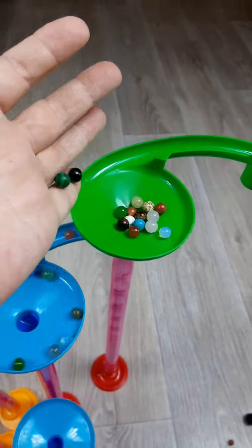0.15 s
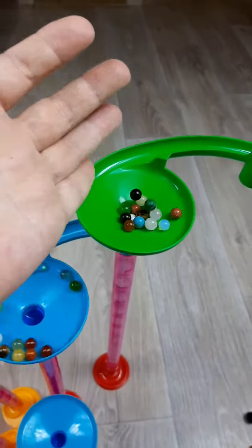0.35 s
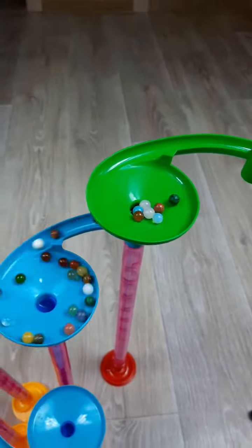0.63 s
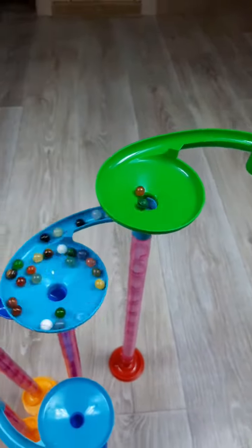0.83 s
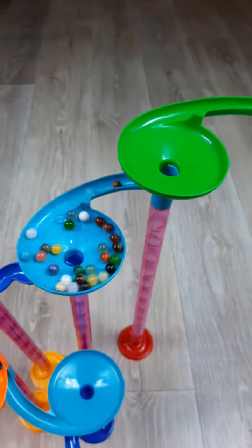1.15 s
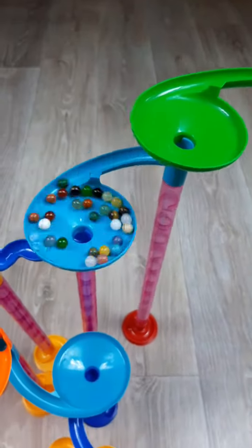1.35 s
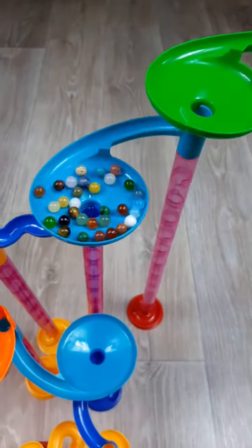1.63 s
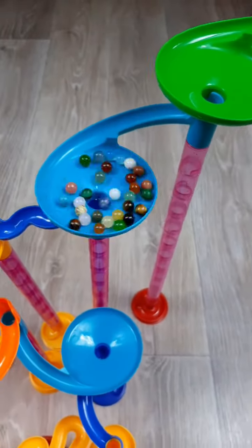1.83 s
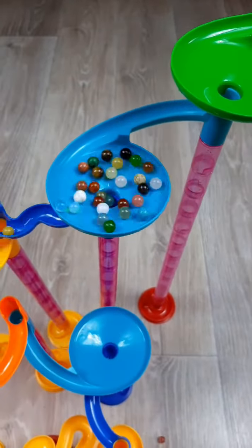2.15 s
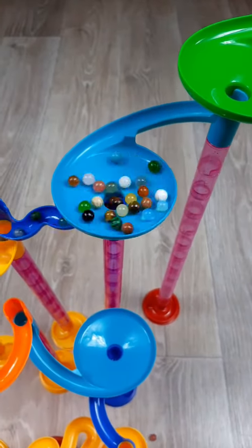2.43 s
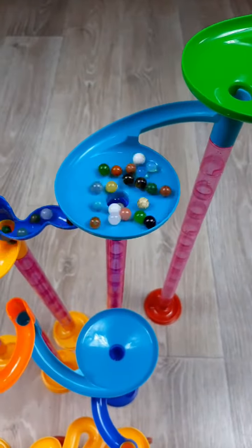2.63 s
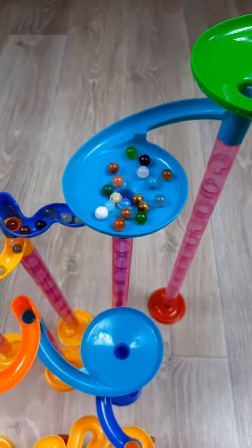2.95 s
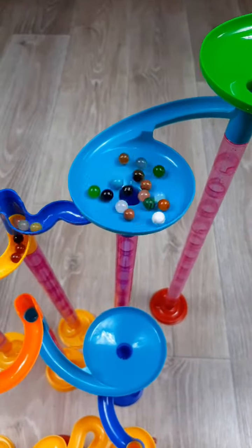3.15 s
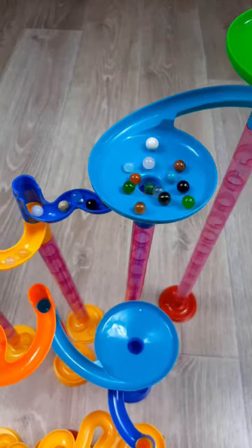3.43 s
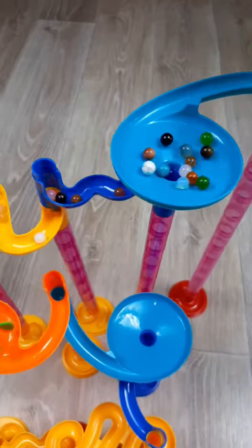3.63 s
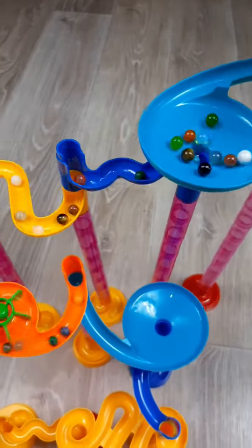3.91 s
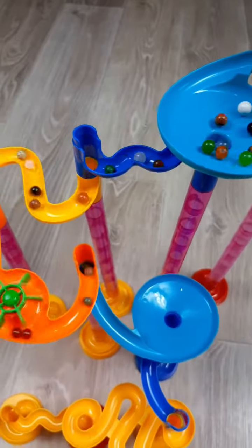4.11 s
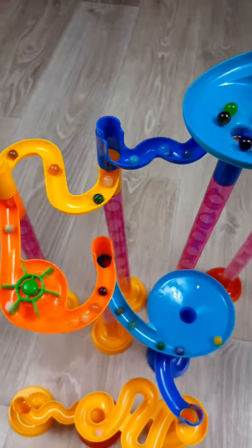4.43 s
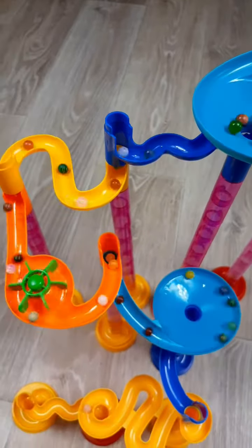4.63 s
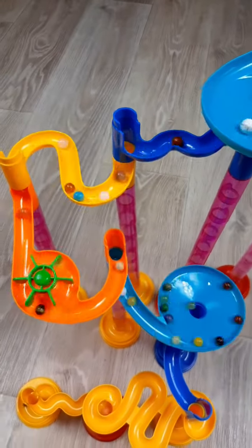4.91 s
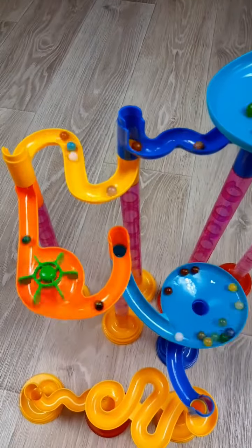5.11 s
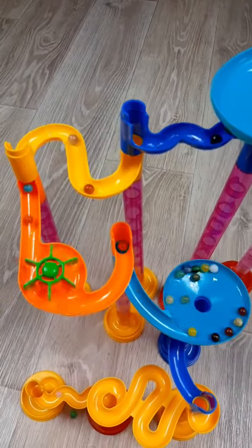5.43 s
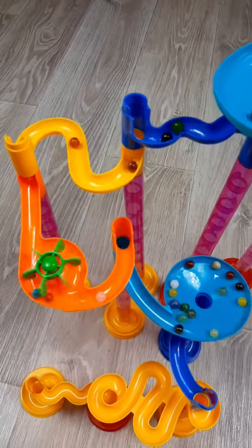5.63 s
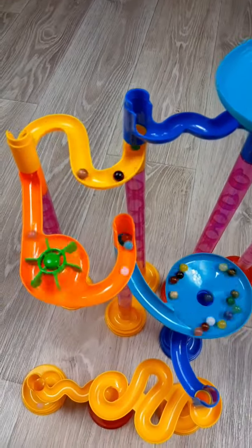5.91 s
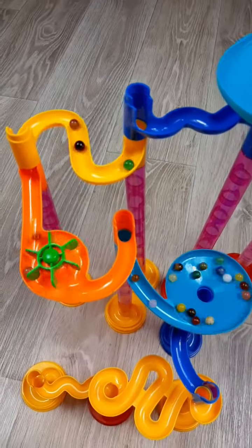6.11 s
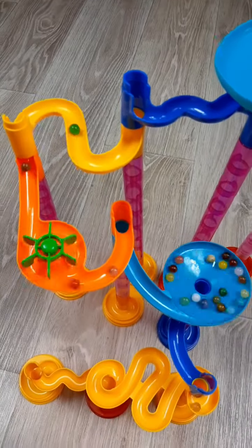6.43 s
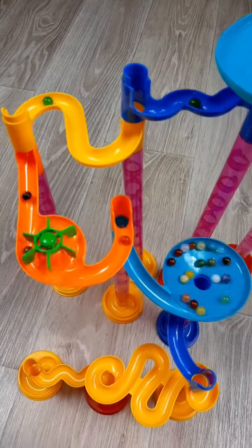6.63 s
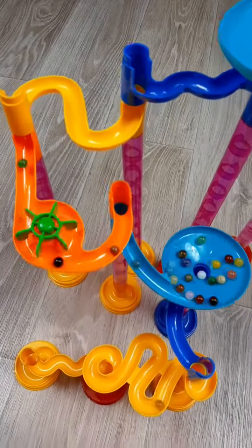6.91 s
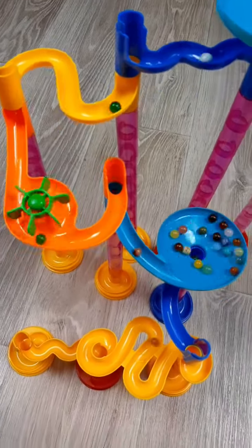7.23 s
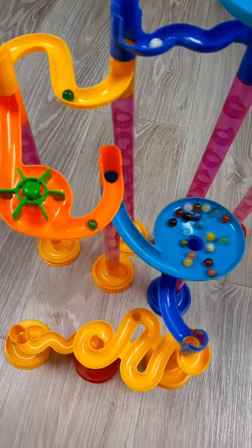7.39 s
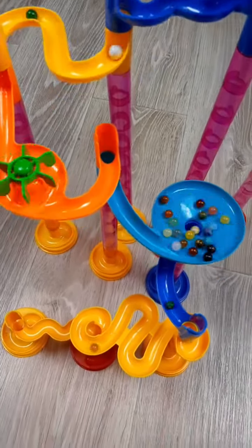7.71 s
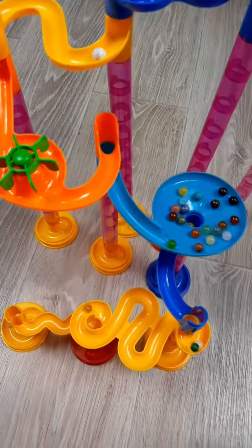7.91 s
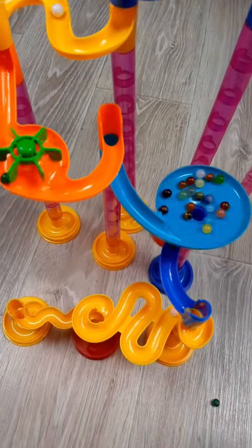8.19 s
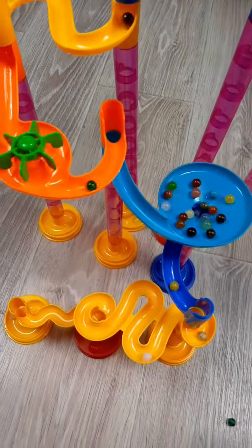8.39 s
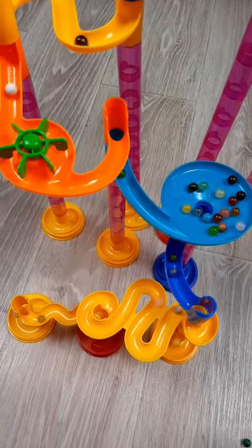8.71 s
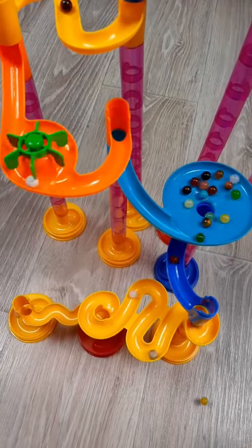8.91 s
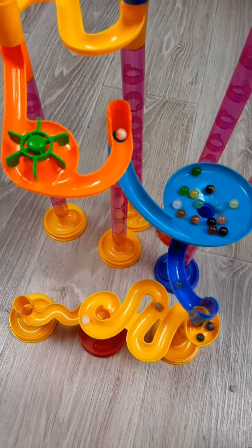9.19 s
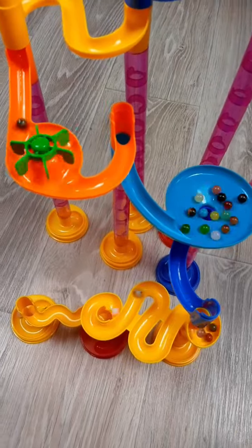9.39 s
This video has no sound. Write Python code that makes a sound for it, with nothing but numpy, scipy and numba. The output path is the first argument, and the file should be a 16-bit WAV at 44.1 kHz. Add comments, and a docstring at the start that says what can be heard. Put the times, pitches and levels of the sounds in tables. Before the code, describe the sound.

Close to a phone microphone in a small room, glass marbles swirl in plastic funnels and rattle along tracks without a break. The rolling starts as a grainy whirr with scattered clicks, then the clicking gets harder and busier, and the whirr changes tone as the marbles reach a lower funnel. Now and then a stray marble bounces on the floorboards with a lower, hollow knock. A faint rumble lies underneath.

```python
"""Glass marbles run through plastic funnels and tracks on a laminate floor, close to a phone in a small
bare room. From the start, rolling on fine texture whirrs in the top funnel, the towers rumble, and
impacts excite the damped modes of the thin plastic. At 0.3 s the first of a few strays strikes the
floorboards. The swarm passes to the middle funnel before 2 s, the knocks grow harder, and from about
4 s it circles in the bottom funnel. Throughout, two microphone ports receive the sound slightly apart."""
import sys
import numpy as np
from scipy import signal
from scipy.fft import rfft, irfft, next_fast_len
from scipy.io import wavfile
from scipy.ndimage import uniform_filter1d, minimum_filter1d
from numba import njit

SR = 44100
rng = np.random.default_rng(int(sys.argv[2]) if len(sys.argv) > 2 else 0)


def store_pcm(level_fs):
    """Save levels as 16-bit WAV."""
    pcm = np.round(np.clip(level_fs, -1, 1) * 32767).astype(np.int16)
    wavfile.write(sys.argv[1], SR, np.atleast_2d(pcm).T)


N = 421155
TIME = np.arange(N) / SR

# The crowd of marbles. Each row: time in seconds, then relative levels in dB of the rolling,
# of the small clatter and of the rolling's treble.
SWARM = [(0.0, -26, -29, 8), (0.26, -32, -38, -4), (0.29, -30, -30, -1), (0.66, -26.5, -28.5, 1.5),
         (1.25, -29, -30, 2.5), (1.44, -28.5, -35.5, -2.5), (1.75, -30, -38.5, -5.5), (1.83, -27, -32, -1),
         (1.94, -30.5, -36, -4), (2.1, -31.5, -38, -7), (2.13, -29.5, -25, 7), (2.2, -30.5, -37, -7),
         (2.31, -33, -26, 2), (2.5, -33.5, -30, 2), (2.53, -35, -31, -7), (2.55, -30, -28, -1),
         (2.69, -29, -22, 6.5), (2.79, -32, -35, 0), (2.87, -28, -26, -0.5), (3.11, -32.5, -26.5, -0.5),
         (3.14, -31, -23.5, 1), (3.46, -29.5, -27, -3), (3.48, -30.5, -27.5, 3), (3.93, -28.5, -24.5, 5),
         (4.79, -27, -23, -0.5), (5.0, -29, -24, 2.5), (5.08, -30, -35, -7.5), (5.21, -30, -26, -3),
         (5.42, -31.5, -26.5, 2), (5.77, -28.5, -37.5, -3), (5.8, -27.5, -27.5, -8.5),
         (6.01, -30.5, -28.5, 0), (6.04, -30, -17.5, 0), (6.12, -29.5, -36, -10.5),
         (6.44, -28.5, -24.5, -3), (6.49, -29.5, -35, -8), (6.86, -28.5, -29, -2.5),
         (7.29, -28.5, -33, -1.5), (7.5, -30, -36, -7.5), (7.85, -27.5, -32, -2.5),
         (8.22, -28.5, -32.5, -5), (8.24, -36, -41, -6), (8.27, -30.5, -37, -6), (8.67, -29.5, -25.5, 2),
         (8.83, -26, -28.5, -9), (8.93, -29, -23.5, -3), (9.1, -29.5, -36, -9), (9.15, -34, -28, -4),
         (9.18, -31.5, -31, -10), (9.55, -29, -34, 3.5)]
# Where the swarm is. Each row: time in seconds, weights (0-1) of the top, middle and bottom funnel.
FUNNEL_WEIGHTS = [(0, 1, .2, 0), (1.2, 1, .3, 0), (1.75, .3, .8, 0), (2.1, 0, 1, 0), (3.4, 0, 1, .1),
                  (4.2, 0, .3, 1), (9.55, 0, 0, 1)]
# Rolling spectra, one list a funnel from the top down. Each row: frequency in Hz, relative level in dB.
WHIRR_SPECTRA = [
    [(290, -60), (500, -17), (795, -5), (1300, -7), (3250, -4), (4530, -10), (12900, -24), (16000, -11.5)],
    [(290, -51), (500, -15.5), (1300, -8.5), (1440, -9.5), (3340, -6.5), (8330, -16.5), (14700, -25),
     (16000, -41)],
    [(290, -6), (500, 8), (1570, 3), (1790, 9.5), (7210, 8), (8330, -1.5), (14700, -2), (16000, -37)],
]
# Hollow resonances of the same funnels. Each row: frequency in Hz, bandwidth in Hz, nominal boost in dB.
FUNNEL_RESONANCES = [
    [(6250, 150, 3), (1460, 70, 3), (2800, 90, 2), (3290, 80, 4.5), (4050, 100, 3)],
    [(1460, 70, 5), (2860, 100, 3), (3330, 120, 2), (3890, 110, 4)],
    [(1200, 70, 3), (1750, 110, 4), (2200, 100, 3), (2620, 90, 4), (3180, 120, 2.5)],
]
# Shaking of the towers. Each row: time in seconds, relative level in dB.
RUMBLE_LEVELS = [(0.0, -59.5), (0.1, -68), (0.5, -64.5), (2.07, -68.5), (2.13, -67), (2.53, -66.5),
                 (3.35, -62.5), (3.4, -64.5), (4.18, -60), (4.84, -61), (5.0, -57), (5.05, -61.5),
                 (7.85, -65), (7.9, -61.5), (8.81, -63.5), (8.83, -55), (9.23, -65.5), (9.55, -62)]
# Spectrum of that shaking. Each row: frequency in Hz, relative level in dB.
RUMBLE_SPECTRUM = [(15, -52), (25, -22), (43, -16), (114, -5.5), (217, -6.5), (339, 0), (454, -2),
                   (494, -4), (700, -20), (910, -4.5), (1540, -120)]
# Hum of the support tubes. Each row: frequency in Hz, bandwidth in Hz, boost in dB.
TUBE_RESONANCES = [(344.4, 6.6, 9.5)]
# Distinct impacts on plastic. Each row: start in seconds, relative level in dB, pitch of the struck
# part in Hz, offset of the crack's drive in dB.
KNOCKS = [(0.0233, -30.5, 3350, -20), (0.0715, -21, 3230, -16), (0.1393, -14, 6040, -23),
          (0.1977, -12, 3980, -24), (0.2914, -14.5, 2370, -6.5), (0.3406, -10.5, 4350, -14.5),
          (0.3667, -20, 3320, -19), (0.391, -21.5, 3180, -11), (0.4622, -11.5, 3230, -14),
          (0.4926, -14, 3280, -22), (0.599, -16, 6530, -18), (0.626, -11, 4010, -28),
          (0.6888, -27, 3320, -22), (0.731, -31, 3260, -24), (0.744, -20, 2750, -14),
          (0.782, -9.5, 3280, -21), (0.8188, -12.5, 6280, -17), (0.899, -24, 3340, -15),
          (0.9246, -25, 3110, -9), (1.0563, -20, 3120, -24.5), (1.1125, -16, 3030, -23.5),
          (1.1573, -13, 3290, -27), (1.244, -20.5, 3170, -13.5), (1.3274, -18.5, 6340, -14),
          (1.7698, -32, 2920, -17), (1.7888, -18, 2470, -15), (1.8355, -6, 3880, -19.5),
          (1.8785, -15, 2250, -20), (2.117, -3, 3900, -23), (2.146, -12, 3900, -18),
          (2.171, -10.5, 3040, -21), (2.2142, -20, 3350, -17), (2.2317, 1.5, 3900, -19),
          (2.2879, 1, 7260, -19.5), (2.3185, -7, 3890, -17), (2.325, -9, 6500, -17), (2.38, -10, 3900, -21),
          (2.4107, -9, 3000, -17), (2.425, -5, 3940, -22), (2.474, -5, 3900, -15), (2.5482, -8, 3880, -22),
          (2.565, -11, 4000, -22), (2.609, -7.5, 3870, -21), (2.6896, -21, 3590, -29),
          (2.722, -12.5, 3600, -28), (2.8065, -27, 5450, -27), (2.827, -14, 3880, -21),
          (2.8716, -4.5, 3850, -16), (2.9605, -14, 2920, -21.5), (2.971, -6, 3820, -23.5),
          (3.02, -13, 3950, -21), (3.057, -14.5, 7000, -14), (3.0974, -12, 5010, -25),
          (3.1259, -1.5, 4000, -20), (3.1762, -4, 3840, -13), (3.209, -19, 3970, -13),
          (3.2462, -1.5, 2900, -16), (3.2747, -18.5, 3830, -20), (3.3113, -12.5, 3900, -24),
          (3.3744, -14, 3950, -17), (3.488, -9, 6700, -17), (3.5084, -7.5, 3870, -23),
          (3.573, -11, 3170, -21), (3.5962, -9, 3930, -16), (3.689, -26, 3940, -21),
          (3.714, -9.5, 6900, -21), (3.7464, -14, 6400, -19.5), (3.7763, -13, 6540, -15),
          (3.8197, -10, 3380, -17), (3.8382, -5.5, 3750, -16), (3.8725, -10, 3650, -22),
          (3.911, -10, 7000, -29), (3.9776, -16, 3660, -9), (4.0112, -6, 7120, -22),
          (4.049, -7.5, 4460, -23), (4.102, -6, 5250, -33), (4.1702, -7, 3600, -12),
          (4.2227, -8.5, 4770, -10.5), (4.2537, -14, 7600, -18), (4.268, -13, 6440, -16),
          (4.2892, -17, 7400, -14), (4.3211, -20, 5540, -18), (4.3563, -25, 2630, -32.5),
          (4.4112, -15.5, 4470, -19), (4.4313, -20, 5430, -25), (4.4612, -14, 4370, -18),
          (4.4962, -12.5, 6870, -25), (4.5506, -25, 3040, -14), (4.6005, -14, 4630, -15),
          (4.6275, -14.5, 7350, -11.5), (4.665, -12, 3420, -4), (4.7112, -17, 7540, -21),
          (4.7395, -8, 2500, -23), (4.8449, -7, 2660, -14), (4.904, -21, 2640, -9),
          (4.9313, -30, 4850, -17), (4.9439, -11, 6770, -8), (4.9945, -13, 2950, -11),
          (5.102, -24.5, 3200, -6), (5.1435, -12.5, 4400, -24), (5.1865, -21, 3320, -15),
          (5.2076, -17, 7700, -12.5), (5.226, -9.5, 6800, -19), (5.2473, -12.5, 7510, -18),
          (5.3195, -15, 3630, -13), (5.343, -14.5, 4630, -11), (5.3597, -13, 6630, -16),
          (5.4033, -18.5, 5140, -5), (5.4408, -11.5, 7040, -16), (5.486, -2, 3900, -16),
          (5.5827, -17.5, 4820, -13), (5.6236, -28, 5700, -13), (5.653, -20, 2630, -7),
          (5.6994, -15, 1830, -11), (5.757, -21, 1820, -17), (5.784, -12, 3680, -15),
          (5.823, -11.5, 7350, -18), (5.858, -14.5, 3880, -15), (5.878, -20, 3480, -19),
          (5.908, -12, 7310, -16), (5.9574, -15, 7720, -19), (6.0129, -20, 2610, -9),
          (6.0263, -8.5, 4370, -15), (6.068, -15, 6950, -6), (6.1357, -25, 3370, -8),
          (6.1456, -26, 3130, -7), (6.1696, -18.5, 2670, -8.5), (6.209, -12.5, 7100, -15),
          (6.3098, -13.5, 3370, -16), (6.338, -17, 3900, -20), (6.3617, -13, 4790, -16),
          (6.4119, -4.5, 6960, -25), (6.4425, -8, 7080, -21), (6.5504, -15, 6730, -10.5),
          (6.5849, -2.5, 7110, -22), (6.6423, -12, 4310, -17), (6.6905, -2.5, 3270, -12.5),
          (6.749, -17, 4400, -16), (6.8057, -21, 2630, -20), (6.83, -4.5, 6700, -14),
          (6.8826, -8.5, 4100, -13), (6.935, -20, 5950, -12), (6.9508, -0.5, 3670, -13),
          (7.0512, -8, 3960, -15), (7.0771, -18, 4430, -14), (7.114, -20, 4420, -19),
          (7.1298, -7, 4350, -22.5), (7.202, -10, 3820, -38), (7.2178, -11.5, 7800, -22),
          (7.251, -10, 4220, -21), (7.268, -9, 3800, -26), (7.3042, -10, 6250, -12),
          (7.3901, -11, 6400, -14), (7.4323, -18, 3090, -10), (7.4618, -16.5, 3300, -24),
          (7.558, -14, 3144, -17), (7.5796, -10, 7150, -11), (7.638, -9, 4440, -12),
          (7.6893, -13.5, 6700, -11.5), (7.7058, -11.5, 6700, -13), (7.7398, -19.5, 5340, -11),
          (7.7653, -19, 3890, -14), (7.7935, -9.5, 3940, -16), (7.813, -6.5, 3700, -23),
          (7.8405, -5, 4220, -14), (7.885, -6, 1740, -20), (7.8885, -8, 6430, -12), (7.896, -8, 3940, -24),
          (7.9378, -5.5, 3860, -15), (7.9706, -9, 4050, -16), (8.0097, -12, 3940, -26),
          (8.0356, -18, 3430, -35), (8.0503, -11.5, 4070, -19), (8.112, -15, 4800, -20),
          (8.1395, -4, 6900, -20), (8.1936, -12, 7000, -25), (8.2134, -20, 1860, -23),
          (8.259, -13.5, 2190, -21), (8.303, -14, 2140, -24), (8.316, -16, 3500, -19),
          (8.3445, -3.5, 6900, -11), (8.372, -12, 3670, -17), (8.4325, -6, 3900, -18),
          (8.4521, -2, 3820, -32), (8.4898, -15, 3840, -18), (8.538, -7.5, 3960, -15),
          (8.5908, -7, 3470, -18), (8.616, -8, 4110, -14), (8.6575, -11, 5140, -19),
          (8.6907, -16, 6860, -11), (8.736, -19, 3500, -14), (8.7837, -16, 3920, -15),
          (8.832, -18, 2830, -15), (8.8776, -6, 3740, -17), (8.9117, -2, 1840, -23), (8.928, -9, 4230, -19),
          (8.976, -8.5, 3700, -27), (9.028, -14.5, 3770, -19), (9.045, -10.5, 3400, -19),
          (9.122, -18, 6070, -15), (9.1489, -9, 4200, -13), (9.211, -15, 6700, -19),
          (9.222, -11, 6340, -16), (9.2547, -7, 4400, -27), (9.2943, -20, 6230, -15),
          (9.3212, -6.5, 4140, -17), (9.342, -14, 3980, -16), (9.392, -4, 5240, -19),
          (9.42, -11, 3240, -16), (9.4539, -6, 7430, -15.5), (9.525, -2, 6840, -19)]
# Modes of tracks and funnels. Each row: frequency in Hz, T60 in seconds before capping, weight in dB.
PLASTIC_MODES = [(1270, 0.0031, -7.5), (1825, 0.0056, -6.5), (1860, 0.051, -15), (2770, 0.0018, -25),
                 (3210, 0.013, -18), (3240, 0.013, -9), (3670, 0.063, -9.5), (4048, 0.025, -7),
                 (4044, 0.02, -17), (4950, 0.013, -8), (5560, 0.019, -10), (6090, 0.024, -6),
                 (6820, 0.0077, -1.5), (7454, 0.024, -3.5)]
# Crack of glass on plastic. Each row: frequency in Hz, relative level in dB.
CRACK_SPECTRUM = [(880, -10), (1500, -3.5), (1610, -8), (3770, -1), (4200, -3.5), (7030, -3), (8320, -8),
                  (14800, -9.5), (16000, 5.5)]
# Strays landing. Each row: time in seconds, relative level in dB, own left-minus-right balance in dB.
FLOOR_BOUNCES = [(0.339, -18.5, 4), (0.687, -23.5, 7), (3.484, -36, -5), (5.143, -16.5, -0.5),
                 (5.513, -9, -2), (5.691, -15.5, -4.0), (8.104, -8.5, -3), (8.194, -18, -3.0),
                 (8.835, -7.5, -6), (8.942, -16, -3.0), (9.04, -8, -3.5), (9.14, -17.5, -2.0),
                 (9.318, -17.5, 2.0), (9.388, -20.5, -4)]
# Modes of the laminate boards. Each row: frequency in Hz, T60 in seconds, weight in dB.
BOARD_MODES = [(433, 0.04, -25), (685, 0.0046, -37), (925, 0.013, -1), (1130, 0.011, -7.5),
               (2300, .01, -31)]
# Bearing of the run as the phone turns. Each row: time in seconds, lead of the left port in ms.
LEFT_LEAD = [(0, 0.34), (3.2, 0.31), (3.7, 0.075), (5.7, 0.036), (6.2, 0.24), (6.8, .25), (7.2, 0.032),
             (9.55, 0.049)]
# Side on which the run lies. Each row: time in seconds, left-minus-right gain in dB.
BALANCE = [(0, 1.5), (2, 3.5), (3, 2), (4, 1), (6, 1), (7.5, 2), (9.55, 1.5)]
# Unequal response of the ports. Each row: frequency in Hz, left-minus-right gain in dB.
PORT_RESPONSE = [(40, 1), (200, -4), (400, -2.5), (800, -1), (2800, -1), (5600, -1), (7500, -8.5),
                 (9500, 3), (12000, -3), (15000, -3.5)]


def undb(db):
    """Amplitude ratio of a level in decibels."""
    return 10 ** (np.asarray(db) / 20)


def unit(x):
    """Normalisation to an rms of 1."""
    return x / np.sqrt(np.mean(x ** 2))


def curve(table):
    """Linear interpolation of (seconds, value) rows at every sample."""
    return np.interp(TIME, *np.transpose(table))


def decay(x, tau_s):
    """Exponential relaxation: each impulse dies away with time constant tau_s."""
    return signal.lfilter([1], [1, -np.exp(-1 / (tau_s * SR))], x)


def walk(rate_hz):
    """Slow random fluctuation: Gaussian steps, smoothed twice."""
    hold = int(SR / rate_hz)
    steps = np.repeat(rng.standard_normal(N // hold + 1), hold)
    return uniform_filter1d(uniform_filter1d(steps, hold), hold)[:N]


def colour(x, points, power=1, peaks=()):
    """Linear filtering by (Hz, dB) points and Lorentzian resonances (Hz, bandwidth in Hz, dB)."""
    size = next_fast_len(N + 4096)
    hz, db = np.transpose(points)
    f = np.arange(size // 2 + 1) * SR / size + 1
    gain = undb(power * np.interp(np.log(f), np.log(hz + 1), db))
    for centre, width, peak_db in peaks:
        gain *= 1 + (undb(peak_db) - 1) / (1 + (2 * (f - centre) / width) ** 2)
    return irfft(rfft(x, size) * gain, size)[..., :N]


def port_noise(common_gain):
    """Partial coherence: shared noise reaches the right port later, and each port adds its own."""
    noise = rng.standard_normal((3, N))
    common, own = noise[0], noise[1:]
    late = np.clip(np.arange(N) - curve(LEFT_LEAD) * SR / 1000, 0, N - 1).astype(int)
    own = own - .85 * signal.lfilter(*signal.butter(1, 1200, fs=SR), own)  # long waves arrive alike
    return common_gain * np.array([common, common[late]]) + np.sqrt(1 - common_gain ** 2) * own


def at_ports(start, db, pan_db, wander_ms=0):
    """Time and level differences: arrival and amplitude of each event at the left and right port."""
    lead = (np.interp(start, *np.transpose(LEFT_LEAD)) + wander_ms) / 1000
    return np.array([start - lead / 2, start + lead / 2]), undb(db + np.array([pan_db, -pan_db]) / 2)


@njit
def add_modes(out, start, pole, length, gain):
    """Superposition: one damped sinusoid per pole is added at both ports."""
    for k in range(len(pole)):
        z = 1 + 0j
        for i in range(length[k]):
            out[0, start[0, k] + i] += gain[0, k] * z.imag
            out[1, start[1, k] + i] += gain[1, k] * z.imag
            z *= pole[k]
    return out


def ring(when, gain, hz, t60):
    """Free vibration of struck modes through 40 dB of decay; axis 0 of when and gain is the port."""
    when, gain, hz, t60 = (v.reshape(2, -1) for v in np.broadcast_arrays(when, gain, hz, t60))
    pole = np.exp((2j * np.pi * hz[0] - np.log(1000) / t60[0]) / SR)
    start = np.clip(when * SR, 0, N - 1).astype(np.int64)
    length = (np.minimum(t60[0], .1) * SR * 2 / 3).astype(np.int64)
    return add_modes(np.zeros((2, N + SR)), start, pole, length, gain)[:, :N]


def funnel_weights():
    """Crossfade: the amplitude weight of each funnel as the swarm descends."""
    times, *weights = np.transpose(FUNNEL_WEIGHTS)
    return [np.interp(TIME, times, weight) for weight in weights]


def agitation(settle_s=.025, reference_db=-21):
    """Stored energy, in dB over rest: each hard knock shakes the run, and damping settles it."""
    start, db = np.transpose(KNOCKS)[:2]
    energy = np.zeros(N)
    energy[(start * SR).astype(int)] = undb(db - reference_db) ** 2
    return 10 * np.log10(1 + decay(energy, settle_s))


def rolling(db, treble_db, treble_hz=5000):
    """Roughness excitation: marbles circling on finely textured plastic make a fluttering whirr."""
    whirr = 0
    for spectrum, weight in zip(WHIRR_SPECTRA, funnel_weights()):
        rough = port_noise(common_gain=.47) * undb(3.12 * walk(300))
        whirr += weight * unit(colour(rough, spectrum))
    dull = signal.lfilter(*signal.butter(2, treble_hz, fs=SR), whirr)
    whirr = dull + undb(treble_db) * (whirr - dull)
    return undb(db - 1.5 + 1.5 * walk(12)) * whirr


def funnel_resonance(drive, waver_db=4):
    """Forced resonance: occupied funnels boost narrow bands, which waver as the marbles circle."""
    out = drive.copy()
    for resonances, weight in zip(FUNNEL_RESONANCES, funnel_weights()):
        for hz, width, db in resonances:
            coupling = weight * undb(waver_db * walk(16) - 2)
            band = signal.lfilter(*signal.iirpeak(hz, hz / width, fs=SR), coupling * drive)
            out += (undb(db) - 1) * band
    return out


def tower_rumble(db):
    """Structure-borne sound: the towers shake on the floor and their support tubes resonate."""
    noise = rng.standard_normal((3, N))
    rumble = colour(noise[0] + .85 * noise[1:], RUMBLE_SPECTRUM, peaks=TUBE_RESONANCES)
    return unit(rumble) * undb(db + 5 + 3 * walk(7))


def plastic_impacts(start, db, hz, crack_db, pan_db, contacts, rattle_s=.003, max_t60_s=.013):
    """Modal response: brief contacts ring damped plastic. Returns the ringing and the crack impulses."""
    mode_hz, t60, mode_db = np.transpose(PLASTIC_MODES)
    events, modes = len(start), len(mode_hz)
    when, size = at_ports(start, db, pan_db, wander_ms=.025 * rng.standard_normal(events))
    delay = rattle_s * rng.random((events, contacts))
    delay[:, 0] = 0
    when = when[..., None] + delay
    force = .45 * np.exp(-delay / .006) * rng.choice([-1, 1], (events, contacts))
    force[:, 0] = 1  # the first contact is the hardest
    # The contacts interfere; their sum at the struck pitch is evened out, within limits.
    phasor = np.sum(force * np.exp(-2j * np.pi * hz[:, None] * delay), axis=1, keepdims=True)
    force /= np.clip(np.abs(phasor), .6, 1.6)
    # Each part has its own tuning, and modes near the struck pitch are favoured.
    part_hz = mode_hz * (1 + .033 * rng.standard_normal((events, modes)))
    struck = np.arange(events), np.abs(np.log(mode_hz / hz[:, None])).argmin(axis=1)
    part_hz[struck] = hz
    nearness = np.exp(-(np.log(part_hz / hz[:, None]) / .11) ** 2)
    share = undb(mode_db) * (undb(-7) + nearness)
    share[struck] = undb(1)
    share /= np.sqrt(np.sum(share ** 2, axis=1, keepdims=True))
    directivity = undb(1.5 * rng.standard_normal((events, modes, 2)))
    polarity = (-1) ** np.arange(modes)
    gain = size[..., None] * share * polarity * np.moveaxis(directivity, 2, 0)
    gain = gain[..., None] * force[:, None]  # port, event, mode, contact
    ringing = ring(when[:, :, None], gain, part_hz[..., None], np.minimum(t60, max_t60_s)[:, None])
    sample = np.clip(when * SR, 0, N - 1).astype(int)
    height = (size * undb(crack_db))[..., None] * np.abs(force)
    impulses = np.zeros((2, N))
    for port in range(2):
        np.add.at(impulses[port], sample[port].ravel(), height[port].ravel())
    return ringing, impulses


def clatter(db, per_s=400, bunch_db=1.8, scatter_db=2.5):
    """Shot noise: crowded marbles make countless small impacts whose level swells and thins."""
    start = np.sort(rng.random(int(per_s * N / SR))) * N / SR
    strength, pitch, hardness, side = rng.random((len(start), 4)).T
    level_db = np.interp(start, TIME, db + bunch_db * walk(22)) - 5
    level_db -= scatter_db * np.log(1 - .9 * strength)
    return plastic_impacts(start, level_db, hz=1900 * 3.9 ** pitch, crack_db=-13 + 8 * (hardness - .5),
                           pan_db=8 * (side - .5), contacts=1)


def knocks(rebound_s=.0105, rebound_db=-12, pan_spread_db=2):
    """Inelastic collision: a marble rattles against the plastic, hops once and lands more softly."""
    start, db, hz, crack_db = np.transpose(KNOCKS)
    side, hop, strength = rng.standard_normal((len(start), 3)).T
    pan_db = pan_spread_db * side
    ringing, impulses = plastic_impacts(start, db, hz, crack_db, pan_db, contacts=4)
    landing = start + rebound_s * (1 + .15 * hop)
    landing_db = db + rebound_db + 2 * strength
    hop_ringing, hop_impulses = plastic_impacts(landing, landing_db, hz, crack_db, pan_db, contacts=2)
    return ringing + hop_ringing, impulses + hop_impulses


def crack(impulses, snap_s=.0014, buzz_s=.007, buzz_db=-18):
    """Modal overlap: many tiny modes merge into a dry snap of noise, then loose joints buzz on."""
    envelope = decay(impulses, snap_s) + undb(buzz_db) * decay(impulses, buzz_s)
    return undb(15.5) * colour(envelope * port_noise(common_gain=.029), CRACK_SPECTRUM)


def floor_bounces(onset_delay_s=.0031):
    """Modal response: stray marbles strike the floorboards, which ring low and hollow."""
    start, db, pan_db = np.transpose(FLOOR_BOUNCES)
    when, size = at_ports(start + onset_delay_s, db, pan_db)
    hz, t60, mode_db = np.transpose(BOARD_MODES)
    mode_gain = undb(mode_db + 2 * rng.standard_normal((len(start), len(hz))))
    return undb(-7.5) * ring(when[..., None], size[..., None] * mode_gain, hz, t60)


def room(direct, t60_s=.16, damping_hz=9800, gain_db=-7, hop=8192):
    """Diffuse reverberation: a decaying noise tail per port, renewed as sources and phone move."""
    t = np.arange(2 * hop) / SR
    envelope = np.exp(-np.log(1000) * t / t60_s) * np.clip(t / .00073, 0, 1)
    dull = signal.lfilter(*signal.butter(1, damping_hz, fs=SR), direct.mean(axis=0))
    dull = np.pad(dull, (hop, 2 * hop))
    window = signal.windows.hann(2 * hop, sym=False) ** .5
    out = np.zeros((2, N + 6 * hop))
    for i in range(0, N + hop, hop):
        piece = dull[i:i + 2 * hop] * window
        tail = rng.standard_normal((2, 2 * hop)) * envelope
        out[:, i:i + 4 * hop - 1] += signal.fftconvolve(piece[None], tail, axes=1)
    return undb(gain_db) * out[:, hop:hop + N] / np.sqrt(np.sum(envelope ** 2))


def scene(funnel_share=.3):
    """Superposition of plastic, floor, room and rumble; hard knocks lift rolling, clatter and rumble."""
    times, *levels = np.transpose(SWARM)
    roll_db, clatter_db, treble_db = (np.interp(TIME, times, db) for db in levels)
    shaken_db = agitation()
    whirr = rolling(roll_db + .25 * shaken_db, treble_db)
    clatter_ringing, clatter_impulses = clatter(clatter_db + .3 * shaken_db)
    knock_ringing, knock_impulses = knocks()
    hits = knock_ringing + clatter_ringing + crack(knock_impulses + clatter_impulses)
    # The whirr passes through the resonances twice, a share of the hits once.
    funnel_drive = funnel_share * hits + funnel_resonance(whirr)
    plastic = (1 - funnel_share) * hits + funnel_resonance(funnel_drive)
    # Small thin parts radiate bass poorly; the boards radiate a little more.
    plastic = signal.sosfilt(signal.butter(3, 800, "high", fs=SR, output="sos"), plastic)
    boards = signal.sosfilt(signal.butter(4, 260, "high", fs=SR, output="sos"), floor_bounces())
    direct = (plastic + boards) * undb(curve(BALANCE) * np.array([[.5], [-.5]]))
    return direct + room(direct) + tower_rumble(curve(RUMBLE_LEVELS) + .3 * shaken_db)


def record(dry, ceiling=.95, cutoff_hz=15050):
    """Transduction: each port colours the sound, one limiter acts on both, and a low-pass follows."""
    ports = np.array([colour(dry[0], PORT_RESPONSE, power=.5), colour(dry[1], PORT_RESPONSE, power=-.5)])
    allowed_gain = np.minimum(1, ceiling / (np.abs(ports).max(axis=0) + 1e-9))
    gain = uniform_filter1d(minimum_filter1d(allowed_gain, size=45), size=23)
    return signal.sosfilt(signal.ellip(10, .2, 75, cutoff_hz, fs=SR, output="sos"), gain * ports)


dry = scene()
out = record(dry)
store_pcm(out)
```